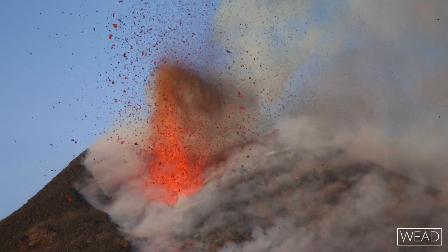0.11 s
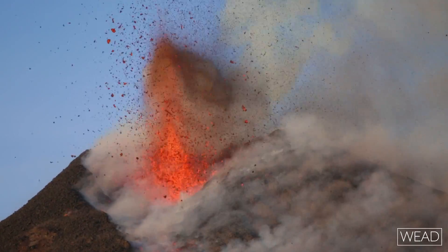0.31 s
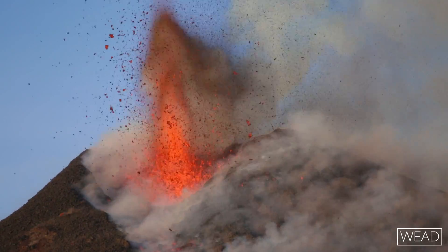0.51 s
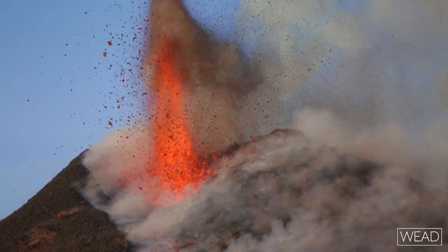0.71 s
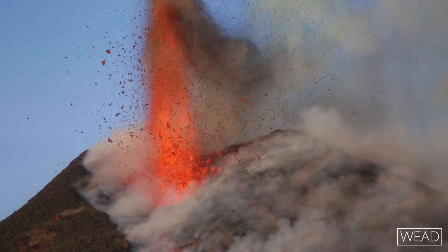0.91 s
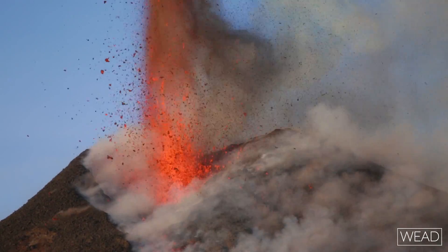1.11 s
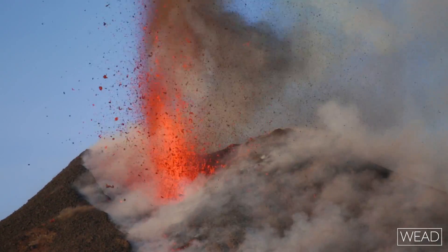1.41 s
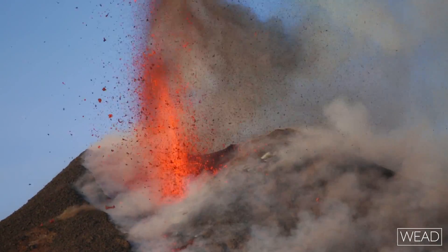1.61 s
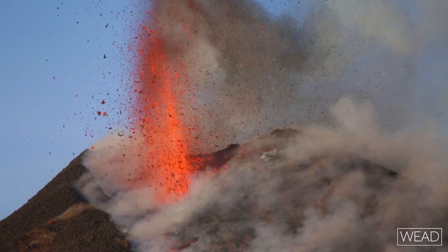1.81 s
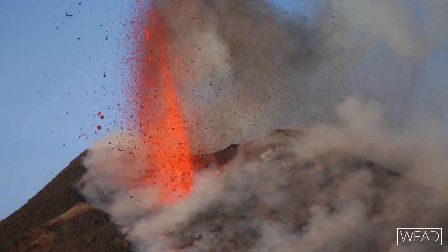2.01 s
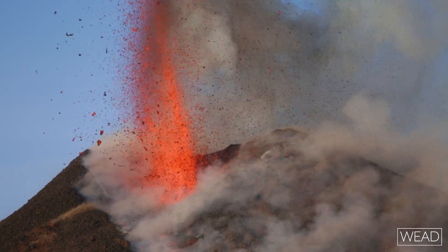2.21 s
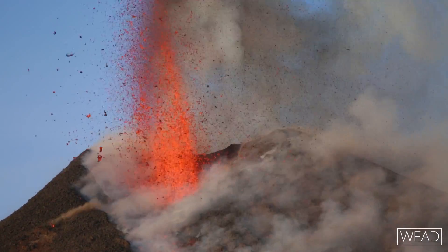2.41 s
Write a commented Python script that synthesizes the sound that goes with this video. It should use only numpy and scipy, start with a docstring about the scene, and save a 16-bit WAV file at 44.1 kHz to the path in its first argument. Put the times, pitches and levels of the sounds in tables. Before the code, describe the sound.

Explosive lava fountain bursts, heard from far off: dull heavy booms and roar over faint deep rumbling

```python
"""A volcanic vent throws up a lava fountain, heard from far across an open mountainside.
A low rumble of filtered noise runs throughout, under a faint first blast that is already under way.
Then come the loudest blasts, close together: lumpy noise makes a boom and a roar, smooth noise a hiss of spray.
Short swinging pulses thud inside them as pressure fronts, and the hardest overload the recorder.
Weaker blasts follow, and the last two fade only slowly."""
import sys
import numpy as np
from scipy import signal
from scipy.fft import rfft, irfft
from scipy.io import wavfile

SR = 44100
rng = np.random.default_rng(int(sys.argv[2]) if len(sys.argv) > 2 else 0)


def to_wav(sig):
    """Store sig (one row per channel, or 1-D mono) as 16-bit WAV at the path in sys.argv[1].

    Samples outside -1..1 are clipped; the rate is SR.
    """
    pcm = np.clip(np.atleast_2d(sig), -1, 1) * 32767
    pcm = np.round(pcm).astype(np.int16)
    wavfile.write(sys.argv[1], SR, pcm.T)  # frames by channels


N = 114660  # length in samples

# Low noise of the crater and open air, as a spectrum: pitch_hz, level_db (per Hz, relative)
RUMBLE_SPECTRUM = [(20, -10.5), (40, -3), (62, 3), (100, 3), (190, -2), (280, -17), (450, -19), (650, -7),
                   (800, -17.5), (950, -21), (1300, -24), (1700, -33), (2300, -37.5), (3100, -37),
                   (3700, -48), (6000, -49.5), (13000, -53.5)]
# Gas blasts: start_s, rise_s, hold_s, fall_db_per_s, boom_db, roar_db, spray_db
GAS_BLASTS = [(-.2, 0.018, 0.3, 24, -41, -51.5, -66), (0.178, 0.07, 0.078, 36.5, -14, -13, -49.5),
              (0.437, 0.02, .05, 69.5, -19.5, -19, -63.5), (0.569, .03, 0.056, 86, -11, -12.5, -67.5),
              (0.711, .018, 0.14, 29.5, -17.5, -24.5, -62.5), (1.056, 0.15, 0.056, 67, -25.5, -28, -73.5),
              (1.377, .03, 0.076, 93, -31.5, -40, -72), (1.843, 0.081, 0.044, 100, -35.5, -37.5, -53.5),
              (2.005, .05, .08, 2, -42.5, -46, -64.5), (2.32, 0.079, 0.058, 1, -37.5, -37.5, -72)]
# Spectra of the three parts of a blast: pitch_hz, level_db (per Hz, relative)
BOOM_SPECTRUM = [(20, -51), (40, -28.5), (62, -16.5), (100, -8), (150, -4.5), (200, -1), (250, -6),
                 (320, -11), (500, -32), (900, -62), (2000, -91)]
ROAR_SPECTRUM = [(60, -25), (180, -18), (300, -0.5), (400, 2), (470, 3.5), (520, 1.5), (640, 0.5),
                 (790, -6.5), (910, -19.5), (1050, -19), (1150, -29), (1300, -24.5), (1600, -40.5),
                 (2200, -45), (3200, -61), (4500, -83)]
SPRAY_SPECTRUM = [(400, -8.5), (1000, 5.5), (1500, 2.5), (1950, -1), (2250, -11.5), (2650, -4), (3150, -15),
                  (3600, -14.5), (5000, -40), (9000, -48)]
# Pressure fronts from bursting gas pockets: middle_s, peak_db (before clipping), pitch_hz, half_length_s
PRESSURE_FRONTS = [(.2547, .6, 400, .0019), (.270, .8, 510, .002), (.314, 1.2, 220, .0025),
                   (.3232, 3.2, 380, .0016), (.330, 1.5, 190, .0032), (.604, .5, 170, .004),
                   (.6212, 2.8, 230, .0024), (.6258, 3, 190, .0028), (.6325, .2, 210, .003),
                   (.212, -8, 560, .002), (.667, -7, 190, .005), (.681, -6, 190, .004),
                   (.741, -6, 330, .003), (.773, -7, 190, .005), (.863, -10, 160, .005),
                   (.902, -6, 230, .0035), (1.233, -12, 190, .004), (1.302, -14, 250, .014),
                   (1.375, -23, 220, .008), (1.446, -20, 330, .003), (1.913, -25, 190, .005),
                   (1.953, -23, 170, .005), (2.456, -21, 410, .005)]

RUMBLE_DB, RUMBLE_SWAY_DB, RUMBLE_SWAY_HZ = -45.5, -1.0, 8
# Small bursts make the rush lumpy: average rate, spread of their sizes, share of the power
POPS_PER_S, POP_SPREAD_DB, POP_SHARE = 900, 2.5, 0.48
SURGE_HZ, SURGE_DB = 26, 0.75  # turbulence shakes the whole jet
FRONT_GLIDE = 0.11  # share by which a front's pitch sags over its half length
FRONT_CLEARS = 0.85  # share of the rush that gives way to a front of full strength
CEILING = 0.97  # full scale of the recorder
LOW_CUT_HZ, TOP_EDGE_HZ = 50, 14100


def amp(db):
    """Turns decibels into gain."""
    return 10 ** (np.asarray(db) / 20)


def evened(x):
    """Scales a sound to an average strength (rms) of one."""
    return x / np.sqrt(np.mean(x ** 2) + 1e-20)


def coloured(x, spectrum):
    """Filters a sound with the spectrum of a table, at an rms of one."""
    table_hz, table_db = np.transpose(spectrum)
    f = np.fft.rfftfreq(N, 1 / SR)
    level_db = np.interp(np.log(f + 1), np.log(table_hz), table_db)
    return evened(irfft(rfft(x) * amp(level_db), N))


def wander(rate_hz):
    """Random drift, mostly up to about the given rate, at an rms of one."""
    f = np.fft.rfftfreq(N, 1 / SR) / rate_hz
    noise = rng.standard_normal(N)
    return evened(irfft(rfft(noise) * f * np.exp(-f ** 2), N))


def rumble():
    """The low noise of the crater and the open air, swaying slightly in level."""
    level_db = RUMBLE_DB + RUMBLE_SWAY_DB * wander(RUMBLE_SWAY_HZ)
    return amp(level_db) * coloured(rng.standard_normal(N), RUMBLE_SPECTRUM)


def turbulence():
    """Churning gas: a dense stream of small pressure pops of either sign over a smooth rush."""
    size = amp(POP_SPREAD_DB * np.minimum(rng.exponential(1, N), 3))
    sign = rng.choice([-1, 1], N)
    happens = rng.random(N) < POPS_PER_S / SR
    pops = evened(size * sign * happens)
    rush = rng.standard_normal(N)
    # square roots, because the share is one of power
    return np.sqrt(POP_SHARE) * pops + np.sqrt(1 - POP_SHARE) * rush


def blasts():
    """Each gas blast swells, holds and dies away; their powers add in the boom, the roar and the spray."""
    t = np.arange(N) / SR
    power = np.zeros((3, N))
    for start, rise, hold, fall, *levels_db in GAS_BLASTS:
        age = t - start
        swell = np.clip(age / rise, 0, 1)
        decay = amp(-fall * np.maximum(age - rise - hold, 0))
        power += (amp(levels_db)[:, None] * swell * decay) ** 2
    boom_level, roar_level, spray_level = np.sqrt(power)
    boom = boom_level * coloured(turbulence(), BOOM_SPECTRUM)
    roar = roar_level * coloured(turbulence(), ROAR_SPECTRUM)
    spray = spray_level * coloured(rng.standard_normal(N), SPRAY_SPECTRUM)
    surge = amp(SURGE_DB * wander(SURGE_HZ))
    return (boom + roar + spray) * surge


def fronts():
    """Distance rounds each pressure front into a dull thud; returns the thuds and their strength (0-1)."""
    t = np.arange(N) / SR
    thuds, passing = np.zeros(N), np.zeros(N)
    for middle, peak_db, hz, half in PRESSURE_FRONTS:
        u = (t - middle) / half  # time counted in half lengths
        swell = np.exp(-u ** 2)
        # the squared term makes the pitch sag as the front passes
        swings = np.cos(2 * np.pi * hz * half * (u - FRONT_GLIDE * u ** 2 / 2))
        thuds += amp(peak_db) * swell * swings
        passing = np.maximum(passing, min(amp(peak_db), 1) * swell)
    return thuds, passing


def scene():
    """Adds rumble, blasts and fronts; the rush of the blasts gives way while a strong front passes."""
    thuds, passing = fronts()
    rush = blasts() * (1 - FRONT_CLEARS * passing)
    return (rumble() + rush + thuds)[None]


def record(dry):
    """The recorder cuts peaks beyond full scale flat, so they crackle; then it trims the lows and the top."""
    f = np.fft.rfftfreq(N, 1 / SR)
    clipped = np.clip(dry, -CEILING, CEILING)
    low_cut = f ** 2 / np.hypot(f ** 2, LOW_CUT_HZ ** 2)
    trimmed = irfft(rfft(clipped) * low_cut, N)
    lowpass = signal.firwin(511, TOP_EDGE_HZ, window=("kaiser", 9), fs=SR)
    return signal.oaconvolve(trimmed, lowpass[None], "same")


dry = scene()
out = record(dry)
to_wav(out)
```